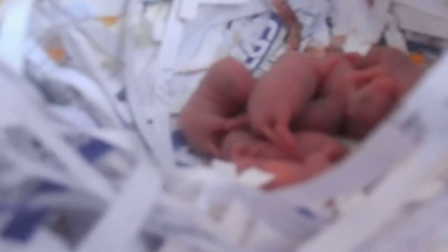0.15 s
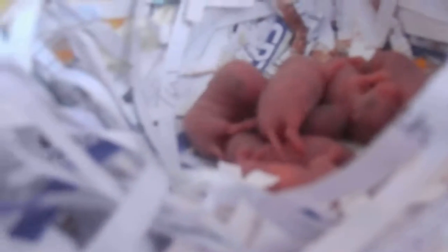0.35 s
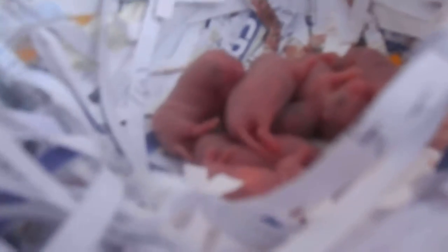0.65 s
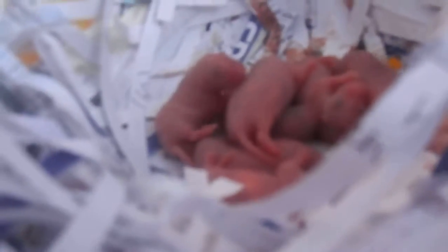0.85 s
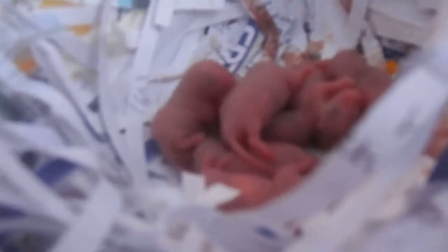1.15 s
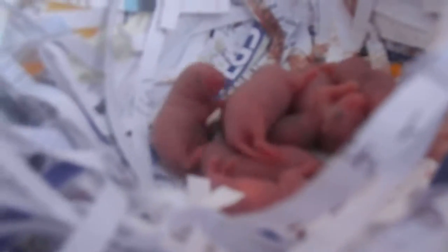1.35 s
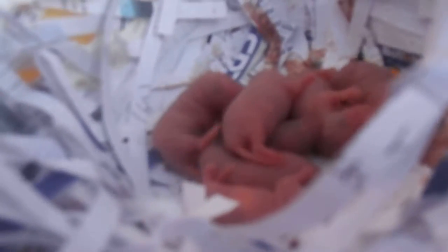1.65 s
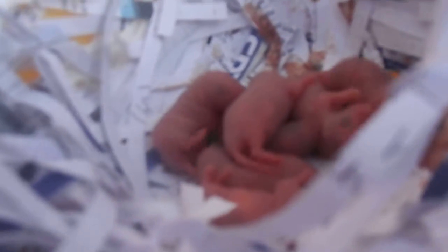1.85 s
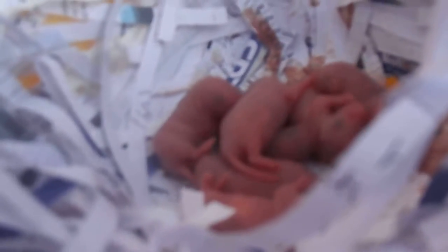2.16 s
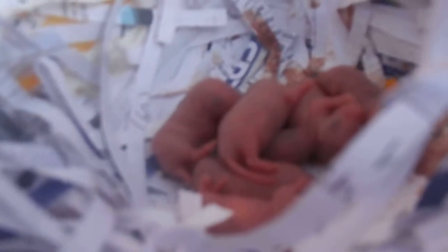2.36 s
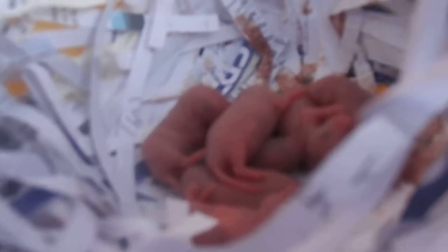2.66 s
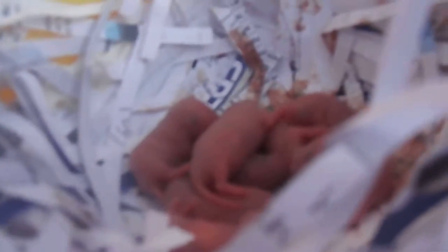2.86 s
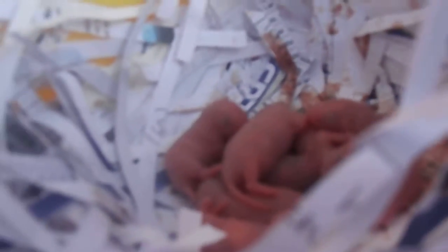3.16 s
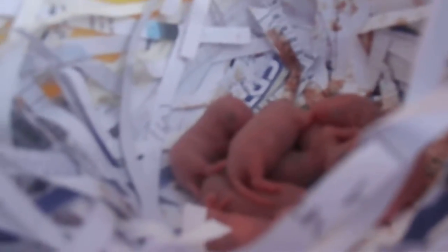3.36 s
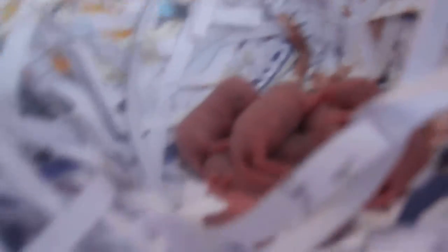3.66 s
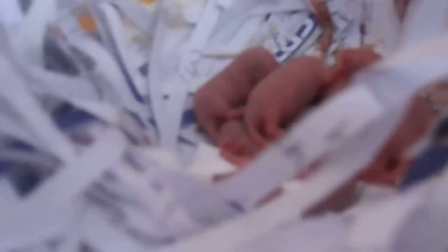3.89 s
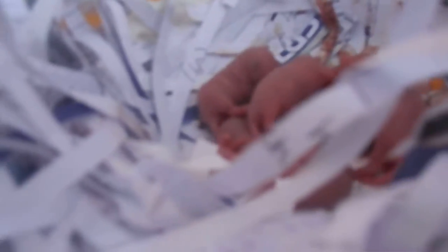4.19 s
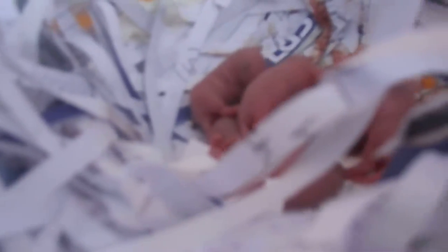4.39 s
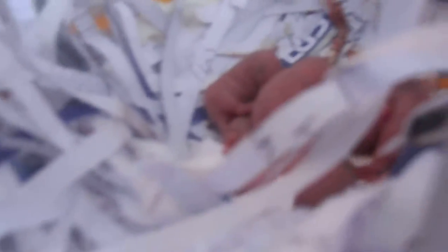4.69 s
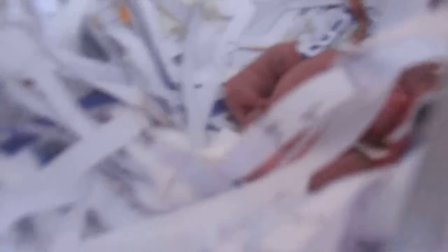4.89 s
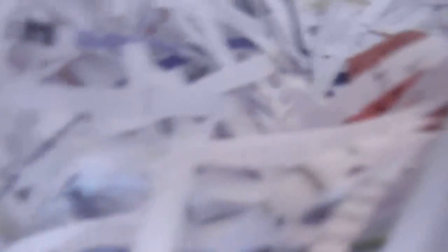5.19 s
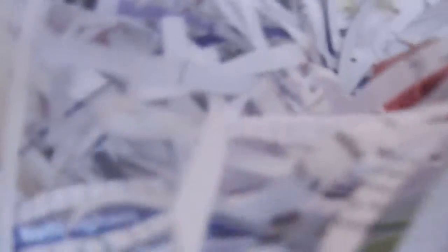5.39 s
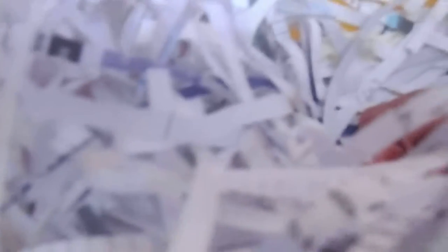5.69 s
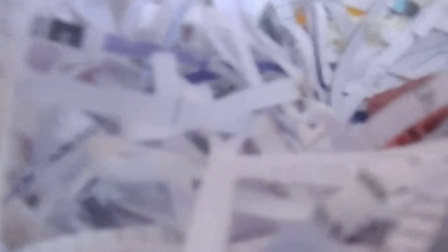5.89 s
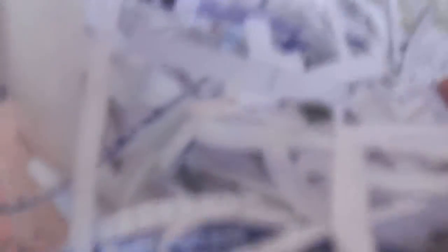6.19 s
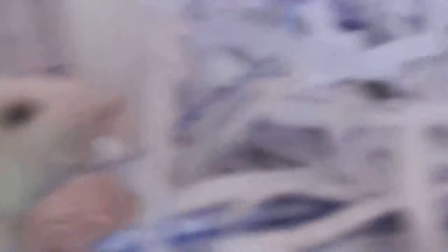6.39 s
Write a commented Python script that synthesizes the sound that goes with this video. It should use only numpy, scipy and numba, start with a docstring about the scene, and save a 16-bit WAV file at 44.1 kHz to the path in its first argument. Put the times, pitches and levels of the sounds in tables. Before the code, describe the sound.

Extremely close, dry sound from a small microphone pushed through shredded paper, over faint room tone and hiss. At 0 s a crisp scrape is already under way, with a bright snap and a soft low bump; small rustles and clicks thin out by 0.8 s. Near-quiet follows, broken by a faint brush around 1.2 s and a brighter click near 1.9 s. From 2.1 s short rustling strokes crowd together, with dull housing rub, and sharp snaps at about 2.8 and 3.0 s. From 3.6 to 4.1 s the handling grows heavier: muffled knocks, gritty scuffs and a very loud crack at 4.1. Another bump and snap come at 4.4, then uneven rustling. A hard, tight double crack at 5.0 s is followed by fading rubs and tiny ticks. After 5.5 s it is almost still, until a light crackle cluster around 6.3-6.4 s.

```python
"""Shredded paper rustles by friction: strips slide over each other in dense tiny slips that ring the
hollows between them. Strips also scuff, snap as they buckle, and creak as single fibres let go.
A small camera pushed about in this nest, where young rats lie, has a housing that hums dully by
resonance when rubbed and rings briefly when knocked. Filtered noise gives quiet room tone and hiss."""
import sys
import numpy as np
from scipy import signal
from scipy.fft import rfft, irfft
from scipy.io import wavfile
from scipy.ndimage import uniform_filter1d
from numba import njit

SR = 44100
rng = np.random.default_rng(int(sys.argv[2]) if len(sys.argv) > 2 else 0)


def put_to_file(sound):
    """Save the sound as 16-bit audio at rate SR, in the file named by the first command-line argument."""
    columns = np.atleast_2d(sound).T  # one column per channel
    safe = np.clip(columns, -1, 1)
    whole_steps = np.round(safe * 32767)
    wavfile.write(sys.argv[1], SR, whole_steps.astype(np.int16))


N = 288414  # length [samples]
SLIDE_TOP_HZ, TOP_HZ = 15900, 16650  # low-pass edges: rustle, scuffs and room tone; microphone output


# Strokes of the camera through the strips: (start [s], length [s], rustle level [dB],
# treble level [dB], housing level [dB], swell from start to end [dB]); levels hold at mid-stroke
STROKES = [(0.0, 0.092, -49, -47, -46.5, 7), (0.086, 0.11, -56.5, -51.5, -51, -10),
           (0.209, 0.12, -70, -58.5, -69, -4), (0.337, 0.028, -53.5, -47.5, -41, -4),
           (0.401, 0.075, -66, -55, -58, -6), (0.517, 0.086, -55.5, -51.5, -55.5, -9),
           (0.615, 0.057, -60.5, -58, -49, -15), (0.713, 0.056, -60, -54.5, -73, -3),
           (1.177, 0.084, -64, -48.5, -55.5, -7), (1.263, 0.16, -63, -58.5, -52, -17.5),
           (1.739, 0.1, -57.5, -56, -55.5, -0.5), (1.852, 0.094, -61.5, -62, -48, -12),
           (1.945, 0.036, -56, -60, -49.5, -3), (2.085, 0.17, -56.5, -62, -53, 15),
           (2.209, 0.084, -51, -55, -46, -7), (2.29, 0.14, -52, -59, -51.5, -5.5),
           (2.41, 0.12, -48, -54.5, -49, 9.5), (2.569, 0.065, -54, -52.5, -47, -6),
           (2.617, 0.082, -54, -60, -59, 21), (2.708, 0.15, -46, -51.5, -40.5, -9.5),
           (2.889, 0.17, -49, -54.5, -42, 6.5), (2.984, 0.052, -54, -45.5, -32.5, 2),
           (3.069, 0.032, -46.5, -47.5, -38, -7), (3.123, 0.098, -65, -63, -61, -15),
           (3.251, 0.1, -47.5, -56.5, -49, -1), (3.43, 0.13, -49.5, -57.5, -50.5, 3.5),
           (3.613, 0.073, -46, -56, -54, 4.5), (3.692, 0.024, -45, -58, -32.5, 6),
           (3.779, 0.052, -39.5, -53.5, -38.5, 7.5), (3.834, 0.099, -53, -61, -40, -16),
           (3.93, 0.071, -45.5, -49, -44.5, -20), (3.994, 0.094, -54, -57.5, -49, 6),
           (4.075, 0.029, -34.5, -46, -30, -4), (4.208, 0.074, -51, -59, -41.5, -6.5),
           (4.317, 0.15, -46, -50.5, -33.5, -0.5), (4.457, 0.07, -61, -68, -51, 9),
           (4.599, 0.08, -49.5, -60, -48.5, 5.5), (4.72, 0.16, -57, -60, -53.5, 6),
           (4.827, 0.1, -50.5, -48.5, -50, -1), (4.933, 0.064, -48.5, -48, -53.5, 6),
           (4.994, 0.19, -60, -74, -43, -23), (5.12, 0.14, -52.5, -56, -49.5, -7.5),
           (5.258, 0.15, -57.5, -60, -57, 4), (5.439, 0.048, -59, -77, -43.5, -18),
           (5.527, 0.099, -62.5, -68, -57, -9), (5.885, 0.047, -61.5, -69, -57, 9),
           (6.139, 0.055, -58.5, -73, -56, 1), (6.266, 0.2, -61.5, -66, -62.5, 9)]
# Spectral slope of the sliding strips: (time [s], tilt [dB per octave])
TILT = [(0, -4.5), (1.8, -5.5), (2.4, -0.5), (3.3, -2.5), (3.8, 2.5), (4.0, 0), (4.65, -1), (5.2, 0),
        (5.4, -5.5), (6, 0), (6.54, -4.5)]
# Paper resting on the housing between strokes: (time [s], level [dB])
RUB = [(0, -63), (.7, -63), (1.5, -70), (2.2, -80), (2.8, -40), (3.4, -61.5), (4.0, -47), (4.6, -50.5),
       (5.3, -60), (5.8, -67.5), (6.54, -63)]
# Resonances of the paper hollow round the microphone: (centre [Hz], width [Hz], gain [dB])
HOLLOW = [(895, 420, 0), (2200, 1520, -2), (3670, 1170, 2), (4730, 2370, 0), (6900, 1980, -2.5)]
# Bright resonances of the paper: (centre [Hz], width [Hz], gain [dB])
SHEEN = [(9570, 12000, 0.67), (11950, 4000, 8.1), (15130, 4500, 6.3)]
STROKE_ATTACK_S, STROKE_RELEASE_S = 0.024, 0.018
REST_RUSTLE_DB, REST_TREBLE_DB = -15, -20  # paper at rest still creeps, relative to RUB


def rustle(t):
    """Stick-slip friction: the same slips excite the hollow and the bright sheen of the paper."""
    _, _, body_db, sheen_db, _, _ = np.transpose(STROKES)
    shared = slips(spread_db=2.0, patchy_db=2.4, rate=110., crinkles=120., crinkle_db=6.0)
    tilt_db = np.interp(t, *np.transpose(TILT))
    body = shifting(shared, HOLLOW, tilt_db, drift=.035, flicker_db=1.7)
    sheen = shifting(shared, SHEEN, 0, drift=.04, flicker_db=1.9)

    rest_db = np.interp(t, *np.transpose(RUB))
    body_stroke = strokes(t, body_db, STROKE_ATTACK_S, STROKE_RELEASE_S)
    sheen_stroke = strokes(t, sheen_db, STROKE_ATTACK_S, STROKE_RELEASE_S)
    # strokes and rest add in power
    body = body * np.hypot(body_stroke, undb(rest_db + REST_RUSTLE_DB))
    sheen = sheen * np.hypot(sheen_stroke, undb(rest_db + REST_TREBLE_DB))
    return lowpass(body + sheen, SLIDE_TOP_HZ)


def slips(spread_db, patchy_db, rate, crinkles, crinkle_db):
    """Stick-slip: dense, mostly tiny fibre slips in uneven patches; folds give way in brief bursts."""
    fold_hits = (rng.random(N) < crinkles / SR) * np.minimum(rng.exponential(size=N), 2.5)
    fade = np.exp(-1 / (0.0008 * SR))  # bursts decay with a 0.8 ms time constant
    burst = 1 + undb(crinkle_db) * signal.lfilter([1], [1, -fade], fold_hits)
    size = np.minimum(rng.exponential(size=N), 5.)
    strength = undb(spread_db * size + patchy_db * walk(rate))
    return burst * strength * rng.standard_normal(N)


def strokes(t, level_db, attack_s, release_s):
    """Incoherent summation: strokes set in, swell or sag and die away; their powers add."""
    power = np.zeros(N)
    for (s, length, *_, swell_db), db in zip(STROKES, level_db):
        i = slice(int(s * SR), int((s + length + 8 * release_s) * SR))
        age = t[i] - s + attack_s * (s == 0)  # the first stroke is already under way
        rise = np.sin(np.pi / 2 * np.clip(age / attack_s, 0, 1)) ** 2
        decay = np.exp(-np.maximum(age - length, 0) / release_s)
        swell = undb(db + swell_db * (np.minimum(age / length, 1) - .5))
        power[i] += (swell * rise * decay) ** 2
    return np.sqrt(power)


def shifting(x, modes, tilt_db, drift, flicker_db):
    """Time-varying resonance: as strips move, each mode wanders in pitch and strength on its own."""
    out = 0
    for k, (hz, w, db) in enumerate(modes):
        gain = undb(db + tilt_db * np.log2(hz / 4000) + flicker_db * walk(30.))
        centre = np.minimum(hz * (1 + drift * walk(8.3)), .4 * SR)
        # neighbours alternate in sign; moving modes are narrower than their listed width
        out = out + (-1) ** k * gain * svf(x, centre, 0.87 * w)
    return level(out, 0)


ECHO_S, ECHO_DB = .0022, -5  # decay constant; total echo energy relative to the direct sound


def folds(x):
    """Multiple reflection: close echoes among the folds give a fine, lasting, uneven colour."""
    t = np.arange(512) / SR
    echo = rng.standard_normal(len(t)) * np.exp(-t / ECHO_S)
    echo = undb(ECHO_DB) * echo / np.sqrt(np.sum(echo ** 2))
    return (x + signal.fftconvolve(x, echo)[:N]) / np.hypot(1, undb(ECHO_DB))


# Strips dragged hard and let go:
# (time [s], rms before the envelope [dB], ring [Hz], treble gain [dB], length [s])
SCUFFS = [(0.035, -42.5, 9500, 3, 0.027), (3.705, -34.5, 6840, -21, 0.015), (3.926, -37, 1470, -15, 0.015),
          (4.092, -34, 2460, -33, 0.014), (4.431, -34.5, 4900, -10, 0.015), (4.645, -56, 895, -4, 0.081),
          (5.006, -25, 2830, -11, 0.024), (5.037, -27.5, 4300, -14, 0.0077), (6.318, -50, 5900, -19, 0.037)]


def scuffs():
    """Transient friction: a gritty burst starts almost at once, sags and stops short."""
    out, t = np.zeros(N + 4096), np.arange(4096) / SR
    chance = rng.standard_normal((len(SCUFFS), 4096))
    grit = rng.exponential(size=(len(SCUFFS), 4096))
    for (s, rms_db, hz, sheen_db, length), noise, size in zip(SCUFFS, chance, grit):
        release = np.clip(t - length, 0, 1) / .0013
        drag = np.clip(t / 0.0014, 0, 1) * np.exp(-.5 * t / length - release)
        gritty = noise * undb(2.2 * size)
        scuff = level(paper(gritty, hz, sheen_db, own_db=7.5), rms_db) * drag
        i = int(s * SR)
        out[i:i + len(t)] += scuff
    return lowpass(out[:N], SLIDE_TOP_HZ)


# Buckling strips: (time [s], peak [dB], ring [Hz], treble gain [dB],
# nominal after-rustle gain relative to the crack [dB])
SNAPS = [(0.0397, -36, 10500, -1, -15), (0.0499, -22, 11300, 3, -10), (0.123, -34, 9100, -12, -5),
         (0.1452, -36, 11300, -16, 4), (0.269, -41, 10800, -8, -3), (0.315, -44, 14100, 1, -10),
         (0.536, -36.5, 9400, -8, 6), (1.286, -44, 10600, -8, -9), (1.776, -38, 11500, -18, 6),
         (1.863, -31, 12400, 8, 6), (1.879, -21.5, 1900, 7.5, 4.5), (2.2265, -51, 6000, -8, -13),
         (2.477, -37, 4800, -6, -8), (2.7697, -12.5, 10500, 0, -12), (2.7695, -19, 2120, -19, -3.5),
         (2.9324, -39, 1920, -15, -1), (3.0364, -6.5, 8870, -27, -7), (3.037, -18, 1920, -30, -8),
         (3.041, -28, 6900, -20, -4), (3.1433, -44, 1730, -36, 5), (3.2836, -54, 2200, -23, -3),
         (3.7007, -27, 5600, -20, -7), (3.804, -32.5, 6800, -11, 2), (3.941, -37, 2560, -27, 7),
         (4.094, -4, 2430, -12.5, -13), (4.4361, -13.5, 4780, -44, -10), (5.0053, -4, 5500, -19, -15),
         (5.0057, -7, 2670, -33, -14), (5.0105, -16, 5000, -14, -17), (5.0366, -7, 2880, -5.5, -9),
         (5.153, -29, 3340, -23, -3), (5.327, -38.5, 1890, -19, -14), (5.361, -41.5, 2070, -23, 8),
         (5.3925, -46, 1900, -8, -9), (5.4288, -42, 1990, -13, -13), (5.47, -47, 2170, -19, 3),
         (6.137, -47, 4040, -16, -12), (6.196, -37.5, 7600, -22, -7), (6.3301, -34, 5930, -18, -12),
         (6.359, -39.5, 5900, -15, -8), (6.377, -42, 6000, -21, -11), (6.409, -40, 7440, -21, -10),
         (6.425, -36, 5900, -25, -18)]
BUCKLE_S = .001  # delay from the listed time to the crack


def snaps():
    """Buckling: a strip cracks, then leaves a duller ragged rustle; weak ones give way slowly."""
    out, t = np.zeros(N + 4096), np.arange(2048) / SR
    # a thin strip radiates little below its lowest bending tones, and the nest swallows the very top
    radiates = signal.butter(3, [1400., 12500.], "band", fs=SR, output="sos")
    chance = rng.standard_normal((len(SNAPS), 2048))
    grit = rng.exponential(size=(len(SNAPS), 2048))
    for (s, peak_db, hz, sheen_db, tail_db), noise, size in zip(SNAPS, chance, grit):
        give_s = 0.00033 * undb(-.2 * peak_db)
        crack = noise * np.exp(-t / give_s)
        crack[:2] = np.array([5.5, -4.5]) * undb(0.033 * peak_db)  # sharp kick and recoil
        ragged = noise[::-1] * undb(tail_db + 1.6 * (size - 3.0))
        tail = ragged * np.exp(-np.log(1000) * t / 0.018)  # falls 60 dB in 18 ms
        snap = paper(crack, hz, sheen_db, own_db=6.5)
        snap = snap + paper(tail, hz, sheen_db - 9, own_db=12.5)
        snap = signal.sosfilt(radiates, snap)
        i = int((s + BUCKLE_S) * SR)
        out[i:i + len(t)] += undb(peak_db) * snap / np.max(np.abs(snap))
    return out[:N]


def paper(blow, hz, sheen_db, own_db):
    """Modal superposition: a strip's own pitch on top of the hollow and the sheen."""
    own = svf(blow, np.full(len(blow), min(hz, 15000.)), 0.2 * hz)
    return ring(blow, HOLLOW) + undb(sheen_db) * ring(blow, SHEEN) + undb(own_db) * own


CREAKS_PER_S, CREAK_S = 23, 0.0015  # mean rate; decay constant of the exciting noise
CREAK_DB, CREAK_SPREAD_DB = -51.5, 1  # base peak; scatter per unit of log size


def creaks():
    """Poisson process: single fibres let go with faint random ticks, each at its own pitch."""
    out, t = np.zeros(N + 512), np.arange(512) / SR
    chance, noise = rng.random((400, 3)), rng.standard_normal((400, 512))
    times = np.cumsum(-np.log(chance[:, 0])) / CREAKS_PER_S
    for s, (_, pitch, size), blow in zip(times[times < N / SR], chance, noise):
        hz = 1200. * 11. ** pitch  # 1.2 to 13.2 kHz
        tick = svf(blow * np.exp(-t / CREAK_S), np.full(len(t), hz), 0.49 * hz)
        peak_db = CREAK_DB - CREAK_SPREAD_DB * np.log(max(size, .15))
        i = int(s * SR)
        out[i:i + len(t)] += undb(peak_db) * tick / np.max(np.abs(tick))
    return out[:N]


# Pitch of the housing hum, moved by the grip: (time [s], centre [Hz])
GRIP = [(0.0, 236), (2.3, 264), (2.7, 294), (4.4, 309), (5.3, 253), (6.54, 286)]
HOUSING_ATTACK_S, HOUSING_RELEASE_S = 0.033, 0.016


def housing(t):
    """Forced resonance: rubbing excites a narrow hum over a duller scrape; a low sway lags behind."""
    hz, housing_db = np.interp(t, *np.transpose(GRIP)), np.transpose(STROKES)[4]
    pushed = strokes(t, housing_db, HOUSING_ATTACK_S, HOUSING_RELEASE_S)
    force = np.hypot(pushed, undb(np.interp(t, *np.transpose(RUB))))

    rub = slips(spread_db=2.0, patchy_db=1.5, rate=32.0, crinkles=60., crinkle_db=-6.0)
    hum = svf(svf(rub, hz, 160.0), hz, 340.0)
    hum = hum + undb(-16) * svf(rub, 460 + 0 * t, 204.0)
    scrape = svf(rub, 1000 + 0 * t, 1400.0)

    # the heavy camera sways on: its force is smoothed over 90 ms
    lag = np.exp(-1 / (.09 * SR))
    lagging_force = signal.lfilter([1 - lag], [1, -lag], force)
    sway = svf(rng.standard_normal(N), 130 + 0 * t, 144.0) * lagging_force ** 0.75
    return (level(hum, -1.83) + level(scrape, -17)) * force + sway * undb(-4)


# Knocks on the housing, dull bumps and lighter taps of paper edges:
# (time [s], peak of the ringing [dB], pitch [Hz], 60 dB decay time, at least 0.01 in use [s])
KNOCKS = [(0.071, -24, 215, 0.055), (0.121, -36, 237, 0.043), (0.362, -42, 243, 0.09),
          (0.473, -45.5, 840, 0.014), (1.293, -39, 250, 0.039), (1.76, -42, 237, 0.087),
          (1.829, -45.5, 510, 0.058), (2.599, -39, 317, 0.3), (2.697, -32, 317, 0.057),
          (2.733, -31.5, 356, 0.13), (2.979, -30, 319, 0.2), (3.146, -35, 533, 0.011),
          (3.703, -38, 216, 0.026), (3.712, -33, 363, 0.049), (3.805, -38, 342, 0.11),
          (3.842, -25.5, 338, 0.07), (3.911, -29, 293, 0.12), (3.928, -36, 760, 0.04),
          (3.992, -35, 324, 0.11), (4.092, -25.5, 328, 0.0092), (4.097, -44.5, 2520, 0.19),
          (4.39, -24, 323, 0.11), (4.437, -20, 354, 0.02), (4.643, -40.5, 807, 0.065),
          (5.006, -24.5, 323, 0.047), (5.042, -46, 99, 0.28), (5.844, -48.5, 1170, 0.046),
          (6.097, -41.5, 483, 0.027)]
PUSH_CYCLES = 0.35  # time constant of the push in cycles, so lower knocks set in more softly
TICK_S, TICK_DB = 0.0051, 3.5  # decay constant; gain for a 1 kHz knock relative to the ringing


def knocks():
    """Impact and free decay: a push rings the housing under a tick of filtered noise."""
    out, t = np.zeros(N + 8192), np.arange(8192) / SR
    chance = rng.standard_normal((len(KNOCKS), 8192))
    for (s, peak_db, hz, t60), noise in zip(KNOCKS, chance):
        push = 1 - np.exp(-t * hz / PUSH_CYCLES)
        decay = np.exp(-np.log(1000) * t / max(t60, .01))
        swing = push * decay * np.sin(2 * np.pi * hz * t)
        swing = swing / np.max(np.abs(swing))
        tick = svf(noise * np.exp(-t / TICK_S), np.full(len(t), 2 * hz), 1.8 * hz)
        tick = tick * np.sqrt(hz / 1000)  # fainter on low knocks
        i = int(s * SR)
        out[i:i + len(t)] += undb(peak_db) * (swing + undb(TICK_DB) * tick)
    return out[:N]


# Spectrum of room tone and hiss: (frequency [Hz], relative density [dB per Hz])
TONE = [(48, -35), (174, 4.5), (248, 5), (620, -0.5), (1090, -2), (1430, -5.5), (1820, -5.5), (5230, -13.5),
        (14600, -13), (15800, -17)]
TONE_DB = -57.5  # overall rms


def room_tone():
    """Spectral shaping: steady noise with a set spectrum drifts a little in level."""
    f = np.fft.rfftfreq(N, 1 / SR)
    hz, db = np.transpose(TONE)
    shape = undb(np.interp(np.log(f + 1), np.log(hz), db))
    noise = irfft(rfft(rng.standard_normal(N)) * shape, N)
    drifting = noise * undb(0.2 * walk(5.0))
    return level(lowpass(drifting, SLIDE_TOP_HZ), TONE_DB)


def undb(db):
    """Decibel law: amplitude gain of a level in dB."""
    return 10 ** (np.asarray(db) / 20)


def level(x, db):
    """Root-mean-square level: scale a signal to the given rms in dB."""
    return x * undb(db) / np.sqrt(np.mean(x ** 2))


@njit
def svf(x, hz, width):
    """Resonance: state-variable band-pass whose centre may move; gain 1 at the centre."""
    y, b, l = np.empty(len(x)), 0., 0.  # output, band state, low state
    for i in range(len(x)):
        g, k = np.tan(np.pi * hz[i] / SR), width / hz[i]
        v = (b + g * (x[i] - l)) / (1 + g * (g + k))
        b, l, y[i] = 2 * v - b, l + 2 * g * v, k * v
    return y


def ring(x, modes):
    """Modal superposition: a sum of fixed resonances; neighbours alternate in sign."""
    flat = np.ones(len(x))
    return sum((-1) ** k * undb(db) * svf(x, hz * flat, 1. * w) for k, (hz, w, db) in enumerate(modes))


def walk(rate):
    """Slow random modulation: levels held 1 / rate s and slewed twice; spread near 1."""
    k = int(SR / rate)
    held = np.repeat(rng.standard_normal(N // k + 1), k)
    return 1.3 * uniform_filter1d(uniform_filter1d(held, k), k)[:N]


def lowpass(x, hz):
    """Band limiting: steep elliptic low-pass."""
    return signal.sosfilt(signal.ellip(10, .2, 80, hz, fs=SR, output="sos"), x)


def scene():
    """Superposition: everything reaches one microphone buried in the paper."""
    t = np.arange(N) / SR
    strips = folds(rustle(t)) + scuffs() + snaps() + creaks()
    camera = housing(t) + knocks()
    return (strips + camera + room_tone())[None]


def record(dry):
    """Band limiting: the small microphone loses the deep bass and the camera cuts the top."""
    no_bass = signal.sosfilt(signal.butter(2, 60., "high", fs=SR, output="sos"), dry)
    return lowpass(no_bass, TOP_HZ)


dry = scene()
out = record(dry)
put_to_file(out)
```